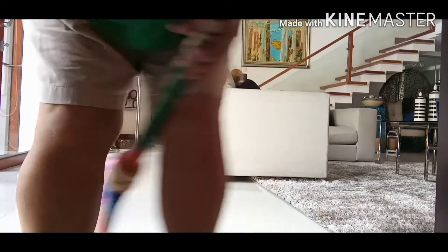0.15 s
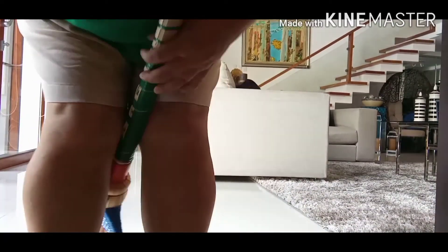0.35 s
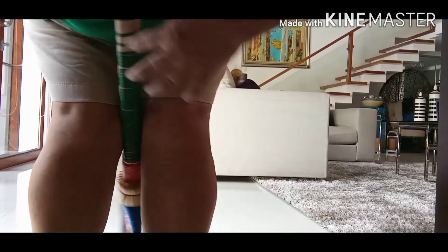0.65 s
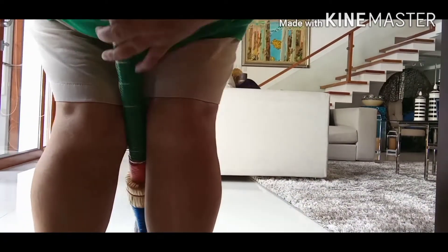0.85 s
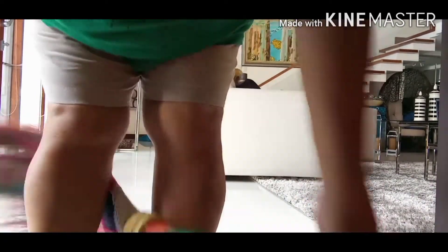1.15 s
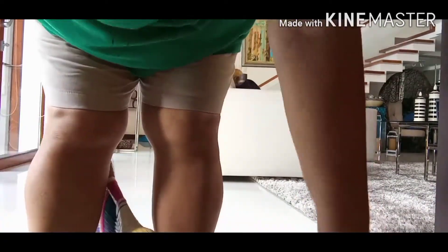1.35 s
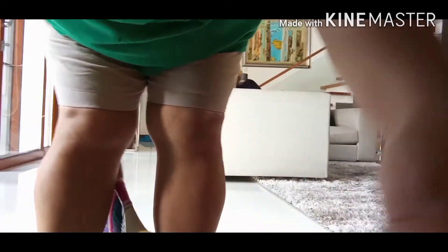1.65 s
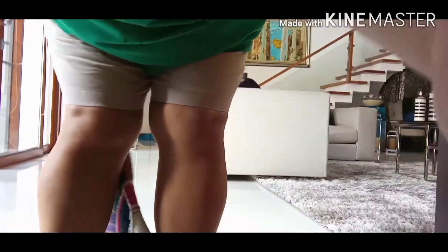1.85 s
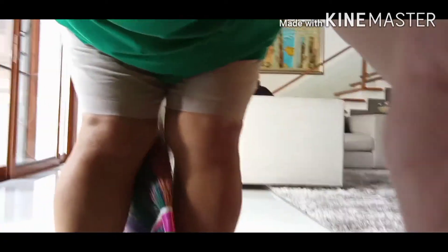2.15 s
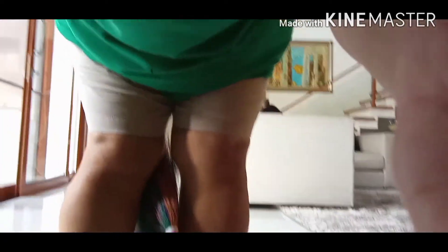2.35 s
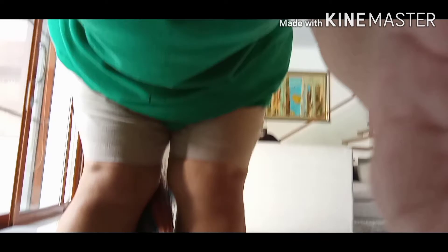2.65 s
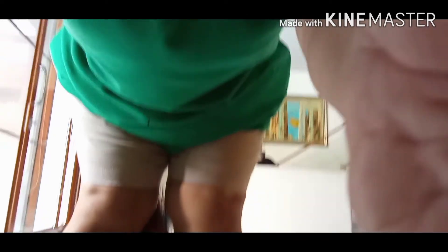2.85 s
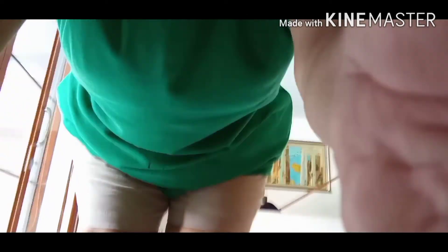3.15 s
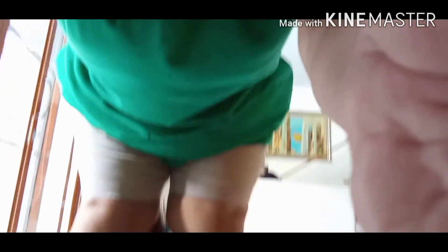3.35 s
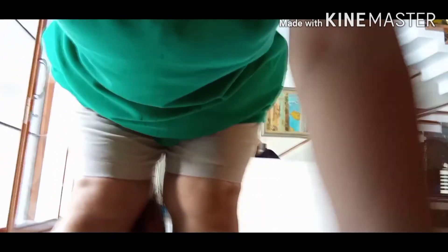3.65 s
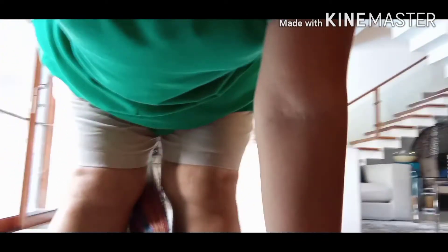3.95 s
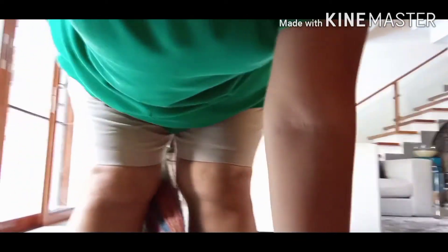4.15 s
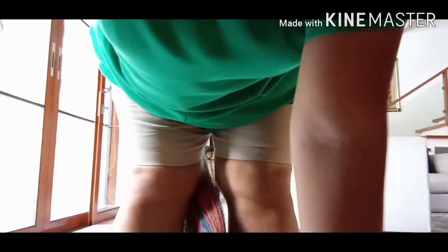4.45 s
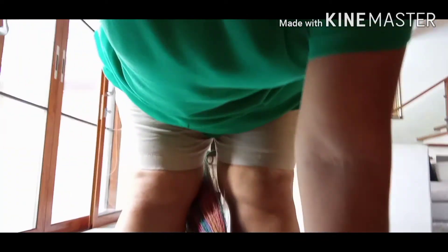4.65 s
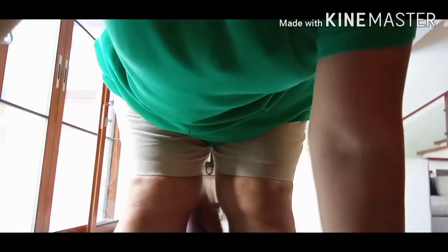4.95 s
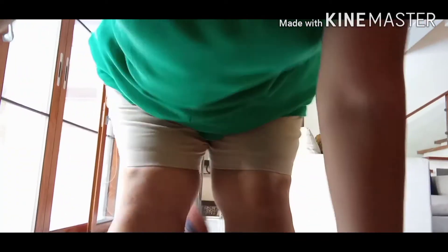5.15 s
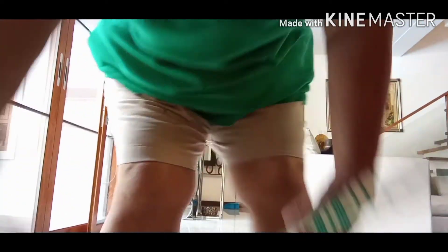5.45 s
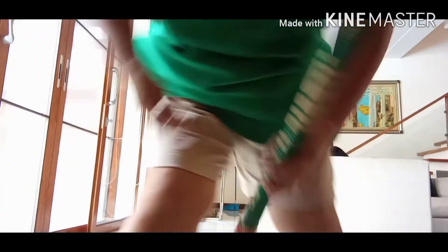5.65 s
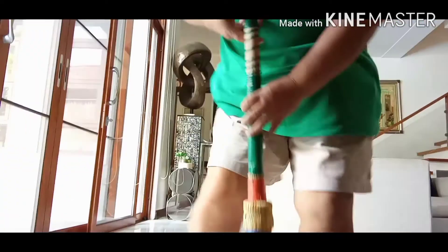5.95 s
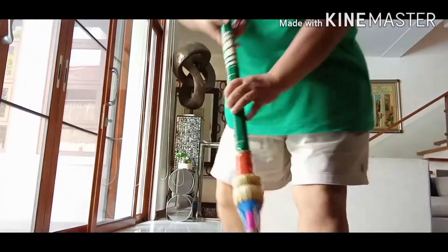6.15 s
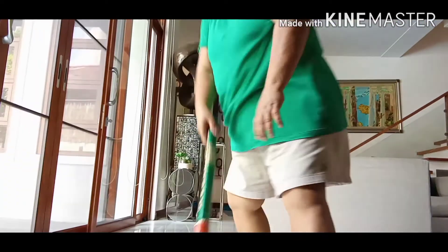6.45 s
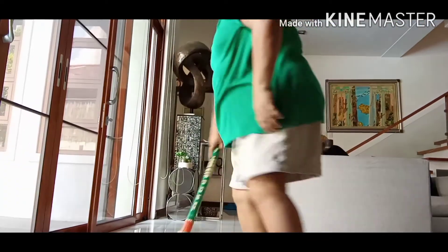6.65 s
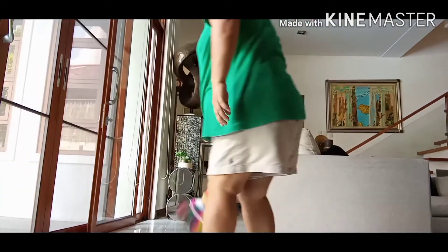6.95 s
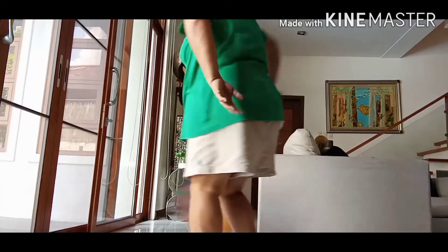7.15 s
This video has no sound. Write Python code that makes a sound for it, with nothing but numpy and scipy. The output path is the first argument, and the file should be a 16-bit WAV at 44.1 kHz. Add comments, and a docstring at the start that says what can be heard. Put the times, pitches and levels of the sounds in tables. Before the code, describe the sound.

Close to a hand-held phone in a house, soft bristles brush over tiles, pushing bits that drag, tick and faintly ring. Sharp clicks are much louder than the sweeping: one burst comes early, and several groups of dry taps follow in the middle as the phone is handled. The light swishes carry on to the end with a few more clicks, over a thin, continuous hiss.

```python
"""A soft broom sweeps a tiled floor close to a hand-held phone with two microphones.
Bristles swish on the glaze and debris drags dully, clicks and rings on the tiles; small metal
pieces sing as they slide and a hollow thing resonates when pushed. Handling the phone adds dry,
close taps and the rumble of fingers on the case.
Behind it are room tone, one brief low hum and a steady band of high hiss."""
import sys
import numpy as np
from scipy import signal
from scipy.io import wavfile
from scipy.ndimage import uniform_filter1d

SR = 44100
rng = np.random.default_rng(int(sys.argv[2]) if len(sys.argv) > 2 else 0)


def store_pcm(level_fs):
    """Save levels as 16-bit WAV."""
    pcm = np.round(np.clip(level_fs, -1, 1) * 32767).astype(np.int16)
    wavfile.write(sys.argv[1], SR, np.atleast_2d(pcm).T)


N = 321930
LEFT_LAG_S, COHERENCE = 41 / SR, 0.12  # between the microphones


def amp(db):
    return 10 ** (np.asarray(db) / 20)


def unit_rms(x):
    return x / np.sqrt(np.mean(x ** 2) + 1e-20)


def db_at(points, hz):
    """Interpolate a spectrum over log frequency."""
    point_hz, db = np.transpose(points)
    return np.interp(np.log(hz + 1), np.log(point_hz + 1), db)


def pan(left_over_right_db):
    """Left and right gains of mean power 1."""
    left = 1 / (1 + amp(-2 * np.asarray(left_over_right_db)))
    return np.sqrt(2 * np.array([left, 1 - left]))


def resonate(x, hz, width_hz):
    """One resonance of gain 1."""
    r = np.exp(-np.pi * width_hz / SR)
    return 2 * signal.lfilter([1 - r], [1, -r * np.exp(2j * np.pi * hz / SR)], x).real


def envelopes(rows):
    """Rows rise, hold and fade, adding in power; one gain curve per level column."""
    t = np.arange(0, N / SR + .001, .001)
    start, rise, hold, fade, *levels = np.transpose(rows)[..., None]
    attack = np.clip((t - start) / rise, 0, 1) ** 1.5
    decay = amp(-fade * np.maximum(t - start - rise - hold, 0))
    gains = [np.linalg.norm(amp(db) * attack * decay, axis=0) for db in levels]
    return [np.interp(np.arange(N) / SR, t, gain) for gain in gains]


# Port imbalance: (frequency [Hz], left over right [dB])
PORT_BALANCE = [(60, -6), (110, 4), (200, 13), (380, -2), (700, 9), (1290, 48), (2380, 89), (4400, -10),
                (8120, 33), (15000, -72)]
def noise(spectrum, patchy_db, flicker_db, lean=0., size=512):
    """Stereo noise with drifting patches and broadband flicker; lean scales the port imbalance."""
    frames, hz = 4 * N // size + 5, np.fft.rfftfreq(size, 1 / SR)[:, None]
    a, b, c, d, patches = rng.standard_normal((frames, len(hz), 5)).T
    patches = unit_rms(uniform_filter1d(uniform_filter1d(patches, size=6, axis=0), size=16, axis=1))
    flicker = unit_rms(uniform_filter1d(rng.standard_normal(frames), size=3))
    right = a + 1j * b
    shared = COHERENCE * right * np.exp(-2j * np.pi * hz * LEFT_LAG_S)
    left = shared + np.sqrt(1 - COHERENCE ** 2) * (c + 1j * d)
    gain = amp(db_at(spectrum, hz) + patchy_db * patches + flicker_db * flicker)
    bins = np.array([left, right]) * gain * pan(lean * db_at(PORT_BALANCE, hz))
    out = signal.istft(bins, nperseg=size, noverlap=3 * size // 4)[1][:, :N]
    return out / np.sqrt(np.mean(out.mean(0) ** 2))


def reverb(x, bass_t60_s=0.28):
    """Room tail: decaying noise, duller as it dies, different on each side."""
    hz, t, bins = signal.stft(rng.standard_normal((2, SR // 2)), SR, nperseg=256)
    t60_s = bass_t60_s / (1 + hz[:, None] / 9000)
    tail = signal.istft(bins * amp(-60 * t / t60_s), SR, nperseg=256)[1]
    tail[:, :150] = 0
    return signal.fftconvolve(x, tail / np.linalg.norm(tail[0]), axes=1)[:, :N]


# Room tone: (frequency [Hz], relative density [dB])
ROOM_SPECTRUM = [(30, 7), (76, 3), (200, -4), (480, -10.5), (1200, -11.5), (2400, -7.5), (3500, -14.5),
                 (4500, -20), (5500, -25.5), (9500, -10), (12000, -16), (13700, -40), (15000, -15),
                 (15600, -26), (16000, -64)]
def room_tone():
    """Faint broadband floor of the house."""
    return amp(-66) * noise(ROOM_SPECTRUM, patchy_db=1.5, flicker_db=.5, lean=1., size=2048)


# Hiss loudness: (time [s], level [dB])
HISS_LEVEL = [(0.0, -52.5), (1.6, -55), (2.08, -52), (2.22, -47), (2.38, -53), (3.78, -52), (3.81, -60),
              (3.87, -53), (4.86, -52.5), (5.2, -54), (6.08, -54.5), (7.3, -53)]
# Hiss band: (frequency [Hz], relative density [dB])
HISS_SPECTRUM = [(4000, -75), (5200, -107), (5900, -8.5), (6600, -1), (7500, 3), (8300, 1), (9000, -7.5),
                 (9800, -65), (11500, -70)]
def high_hiss():
    """Continuous 6-9 kHz band with one brief swell and one brief dip."""
    level_db = np.interp(np.arange(N) / SR, *np.transpose(HISS_LEVEL))
    return amp(level_db) * noise(HISS_SPECTRUM, patchy_db=1.64, flicker_db=0.67, lean=0.71)


# Hum swell: (start [s], rise [s], hold [s], fade [dB/s], level [dB])
HUM_SWELL = [(5.95, 0.13, 0.91, 40, -65.5)]
def low_hum(hz=136, width_hz=27):
    """Narrow low noise that swells once."""
    hum = resonate(resonate(rng.standard_normal(N), hz, width_hz), hz, 2 * width_hz)
    return envelopes(HUM_SWELL)[0] * unit_rms(hum) * pan([4.])


# Air rumble: (frequency [Hz], relative density [dB])
PORT_SPECTRUM = [(18, -60), (30, 7), (65, 5), (86, -5.5), (155, -14.5), (194, -19), (260, -41), (280, -71),
                 (360, -68), (620, -120)]
def port_air():
    """Air rumbles unevenly at the microphone ports."""
    return amp(-66.5) * pan([7.5]) * noise(PORT_SPECTRUM, patchy_db=3.5, flicker_db=5.0, size=2048)


# Finger shifts: (peak time [s], level [dB])
FINGER_THUMPS = [(.21, -52.5), (0.281, -41), (0.332, -48), (.41, -35.5), (0.451, -41.5), (0.512, -41),
                 (0.552, -45), (0.608, -35.5), (.89, -57), (1.12, -52.5), (1.4, -59), (2.5, -60),
                 (3.78, -55), (3.94, -53), (4.02, -60), (4.51, -68), (4.66, -53), (5.81, -64), (6.16, -67),
                 (6.69, -56.5)]
# Case rumble: (frequency [Hz], relative density [dB])
FINGER_SPECTRUM = [(25, -24), (55, 5), (85, 2.5), (140, -2.5), (200, -12), (270, -27.5), (400, -53),
                   (620, -110)]
def fingers(rise_s=0.038, fade_db_per_s=447):
    """Fingers shift on the case at the left port."""
    level, = envelopes([(s - rise_s, rise_s, 0, fade_db_per_s, db) for s, db in FINGER_THUMPS])
    return level * pan([36]) * noise(FINGER_SPECTRUM, patchy_db=1.5, flicker_db=0.5, size=2048)


# Soft bumps: (time [s], level [dB], frequency [Hz], t60 [s], left over right [dB])
LOW_BUMPS = [(3.769, -38.5, 99.6, 0.037, 30), (3.921, -39.5, 355.5, 0.14, 7), (4.663, -27.5, 132, 0.02, 18)]
def bumps(size=8192):
    """Each bump is a damped low sine."""
    out, t = np.zeros((2, N + size)), np.arange(size) / SR
    for s, db, hz, t60_s, pan_db in LOW_BUMPS:
        bump = amp(db - 60 * t / t60_s) * np.sin(2 * np.pi * hz * t) * np.minimum(t / 0.0013, 1)
        at = round(s * SR)
        out[:, at:at + size] += pan([pan_db]) * bump
    return out[:, :N]


# Modes of the low ring, then the high ring: (frequency [Hz], width [Hz], relative gain [dB])
HOLLOW_MODES = [
    [(245, 11.7, -10.5), (221, 73, -20.5)],
    [(372, 28.3, 13.5), (312.8, 13.3, 12), (398, 25, 3)],
]
# Pushes: (start [s], rise [s], hold [s], fade [dB/s], low ring [dB], high ring [dB])
HOLLOW_SHOVES = [(.735, 0.015, 0.023, 59, -48, -46), (0.997, 0.026, .02, 52, -54, -39),
                 (1.692, 0.04, .18, 400, -77, -66.5), (2.44, 0.028, 0.31, 141, -48.5, -52.5),
                 (3.943, 0.0072, .005, 300, -66, -57), (4.057, .1, 0.018, 300, -81, -59),
                 (4.578, 0.056, 0.039, 900, -62, -48), (5.146, 0.038, 0.096, 300, -90, -65.5)]
def hollow_body():
    """Rubbing shakes the hollow body during each shove."""
    rub = noise([(100, 0), (1000, 0)], patchy_db=0., flicker_db=0., size=2048)
    rub = rub - 0.3 * rub[::-1]  # drives the two ports partly in antiphase
    out = np.zeros((2, N))
    for shove, modes in zip(envelopes(HOLLOW_SHOVES), HOLLOW_MODES):
        ring = sum(amp(db) * resonate(resonate(rub, hz, width), hz, 3 * width)
                   for hz, width, db in modes)
        out += shove * unit_rms(ring)
    return out


# Metal pieces: (modes, roughness [ratio], slides); modes: (frequency [Hz], gain [dB]);
# slides: (start [s], rise [s], hold [s], fade [dB/s], level [dB])
METAL_PIECES = [ ([(673, -3.5), (1461, 8), (2030, -8), (2475, 5), (3755, -1.5), (3766, 6.5), (8950, -7),
                (11040, -6)], 0.69, [(.47, 0.032, 0.078, 62, -56), (.72, 0.049, 0.009, 60.5, -56.5)]),
                ([(5266, 5), (6900, 4), (4680, -4.5)], 1.86, [(.47, 0.024, .01, 60, -63.5),
                (.71, 0.06, 0.097, 110, -55.5)]), ([(1841, 1), (3397, -3), (4172, 4.5), (4209, -5),
                (5060, -18), (5970, -21), (6546, -4), (7059, 3.5), (7190, -8), (8225, -15), (8479, -16),
                (9895, -26), (11050, -14), (11970, -26), (14900, -23)],
                1.9, [(2.13, 0.028, 0.1, 85, -48.5)]), ([(2435, -6.5), (1540, -11)],
                2.1, [(2.64, 0.038, 0.013, 162, -46.5), (2.94, 0.051, .01, 117, -51.5)]), ([(2980, -1)],
                3.1, [(1.67, .04, 0.16, 180, -64), (3.435, .005, 0.0091, 498, -52.5),
                (3.55, 0.056, 0.12, 300, -56)]), ([(1000, 7), (2100, 11.5), (3400, -4)],
                4.8, [(6.0, 0.02, 0.042, 495, -68.5)]), ([(1530, -2.5), (2300, -4), (2650, -9)],
                4.77, [(3.97, .13, .01, 80, -63.5), (4.2, 0.063, 0.06, 150, -66)]), ]
def sliding_metal():
    """Scraping keeps narrow modes ringing; each wavers in level and phase by itself."""
    out = np.zeros((2, N))
    for modes, roughness, slides in METAL_PIECES:
        level, = envelopes(slides)
        active = np.flatnonzero(level > 3e-5)
        t = (active - active[0]) / SR
        for hz, db in modes:
            knots = rng.standard_normal((4, 512))
            knots_per_s = 33 * roughness * (1 + hz / 6000)
            waver = np.array([np.interp(t * knots_per_s, np.arange(512), k) for k in knots])
            phase = 2 * np.pi * hz * (t - np.array([[LEFT_LAG_S], [0]])) + 1.7 * waver[2:]
            gain = level[active] * amp(db + 3 * np.sqrt(roughness) * waver[:2])
            out[:, active] += gain * np.sqrt(2) * np.sin(phase) * pan([5.5])
    return out


# Sharp clicks, from debris on the tiles and dry, close handling taps on the phone:
# (time [s], knock [dB], clack [dB], tick [dB], air [dB], knock [Hz], clack [Hz],
# left over right [dB], room send [dB])
CLICKS = [(0.09, -62, -42, -52, -63, 1720, 4200, 15, -14), (0.117, -45, -29, -57, -47, 1500, 2100, 14, -12),
          (0.177, -66, -38, -32, -27.5, 743, 4520, -1, 4.5),
          (0.195, -35, -26, -22.5, -38, 600, 2470, 6, -6), (0.921, -42, -37, -36, -26.5, 900, 4550, 9, -7),
          (2.048, -13, -15.5, -11.5, -39, 1400, 2330, 3.5, -13.5),
          (2.089, -19.5, -25.5, -26, -38, 860, 1944, 3, -9.5),
          (2.104, -27, -50, -30, -46, 1360, 2010, 13, 1), (2.79, -63, -63, -48, -38, 1270, 1920, -2, -16),
          (3.388, -28.5, -31, -33.5, -30, 620, 1800, 3, -15.5),
          (3.4, -34, -47, -34, -45, 1396, 4270, 3, -10),
          (3.408, -18, -17.5, -41, -16, 1070, 3350, -21, -26),
          (3.438, -25, -31, -24.5, -22, 1100, 2590, -7, -34),
          (3.625, -18.5, -25, -49, -35, 1170, 2900, 19.5, -20),
          (3.74, -43, -35, -31, -25, 1440, 4590, -1, -15), (3.761, -55, -43, -40, -32, 1560, 3160, 1, -14),
          (3.775, -30, -27.5, -22, -24, 1570, 3650, 3, -14),
          (4.562, -25, -26.5, -15, -17, 1710, 2480, 6, -10.5),
          (4.625, -22, -30, -35, -46, 1800, 2270, 3, -9.5),
          (4.63, -32, -29.5, -38, -54, 1900, 2850, -1, -13),
          (4.66, -34.5, -40, -34, -34, 1630, 2260, -1, -31),
          (4.697, -62, -35.5, -49, -38, 1750, 2780, 20, -14),
          (4.735, -46, -54, -48, -35.5, 1530, 3670, 20, 2), (4.79, -56, -47, -50, -55, 1500, 3500, 16, -20),
          (4.797, -55, -39, -50, -55, 1500, 2900, 16, -20),
          (4.848, -30, -25.5, -32, -34, 680, 2500, 16, -18),
          (5.101, -68, -66, -31, -30, 1500, 3540, 10, -17), (5.652, -67, -37, -49, -37, 1720, 2880, 0, -8),
          (5.669, -29, -19, -15, -15.5, 1040, 2970, 3, -13), (5.709, -57, -32, -40, -44, 1270, 3620, 6, 0),
          (6.269, -38, -33, -21.5, -33, 1500, 2860, 3, -10),
          (6.312, -30, -32.5, -55, -56, 1500, 2080, 8, -1.5),
          (6.329, -45, -37, -57, -59, 1410, 2500, 2, -6), (6.424, -57, -40.5, -39, -40, 1340, 2730, 9, -9),
          (6.919, -59, -45.5, -58, -49, 1590, 2010, 9, 3), (7.023, -58, -33, -38, -53, 1660, 2330, 4, -5.5)]
# Broad modes of the tick, then the air band: (frequency [Hz], width [Hz], relative gain [dB])
TREBLE_MODES = [
    [(6430, 780, 1.1), (8310, 1300, 2.2)],
    [(10900, 7100, -1.4), (15000, 2400, -0.58)],
]
def clicks(rise_s=.0012, blow_gain=3.7, size=2048):
    """Contact noise builds to one sharp blow that excites four bands of broad rings."""
    direct, send = np.zeros((2, 2, N + size))
    t, lag = np.arange(size) / SR, round(LEFT_LAG_S * SR)
    since_blow_s = np.maximum(t - rise_s, 0)
    for s, *band_db, knock_hz, clack_hz, pan_db, send_db in CLICKS:
        t60_s = 0.034 * amp(0.38 * send_db)  # drier clicks ring shorter
        contact = rng.standard_normal((2, size))
        blow = (contact + blow_gain * np.sinc((t - rise_s) * SR)) * np.minimum(t / rise_s, 1) ** 2
        knock = [(knock_hz, 8.1 / t60_s, 0), (1.65 * knock_hz, 700, -5)]
        clack = [(clack_hz, 6.7 / t60_s, 0), (4600, 1800, -12)]
        bands = zip(band_db, [knock, clack, *TREBLE_MODES], (0.92, 1.15, 0.75, 0.19))
        click = np.zeros((2, size))
        for peak_db, modes, t60_ratio in bands:
            burst = blow * amp(-60 * since_blow_s / max(t60_s * t60_ratio, .002))
            ring = sum((-1) ** k * amp(db) * resonate(burst, hz, width)
                       for k, (hz, width, db) in enumerate(modes))
            click += amp(peak_db) * ring / abs(ring).max(1)[:, None]
        for side, gain in enumerate(pan(pan_db)):
            at = round(s * SR) - side * lag + lag // 2 - round(rise_s * SR / 2)
            direct[side, at:at + size] += gain * click[side]
            send[side, at:at + size] += amp(send_db) * gain * click[side]
    return direct[:, :N] + reverb(send[:, :N])


# Debris pushes: (start [s], rise [s], hold [s], fade [dB/s], level [dB])
DRAG_STROKES = [(0, 0.15, .01, 64, -64), (.4, 0.12, 0.011, 75, -64), (.735, .01, 0.13, 67, -49.5),
                (.92, .005, 0.0091, 130, -63), (1.0, 0.058, 0.036, 79.5, -51.5),
                (2.05, 0.0024, .005, 79, -40), (2.46, 0.0036, 0.24, 60, -50.5),
                (3.5, 0.19, 0.012, 300, -61), (3.73, 0.0042, 0.0091, 157, -53.5),
                (3.82, 0.083, 0.0076, 142, -54.5), (4.6, 0.19, 0.056, 64, -68),
                (4.94, 0.011, 0.013, 258, -50.5), (5.35, .16, 0.18, 200, -66), (5.67, .003, .01, 61, -54),
                (6.27, 0.022, .01, 130, -58), (6.44, 0.02, .01, 123, -66), (6.9, 0.099, .01, 92, -67.5)]
# Debris friction: (frequency [Hz], relative density [dB])
DRAG_SPECTRUM = [(300, -7), (600, -2.5), (900, -1.5), (1400, 0), (1900, 3), (2500, -7), (3200, -16),
                 (5000, -78)]
def debris_drag(rest_db=-73.5):
    """What the broom pushes along scrapes dully over the tiles."""
    level = np.hypot(envelopes(DRAG_STROKES)[0], amp(rest_db))
    return level * noise(DRAG_SPECTRUM, patchy_db=3.0, flicker_db=0.74, size=1024) * pan([2.5])


# Broom strokes: (start [s], rise [s], hold [s], fade [dB/s], swish [dB], airy top [dB])
BROOM_STROKES = [(0, .17, .02, 90, -50.5, -57), (.74, 0.043, .01, 67, -49.5, -54.5),
                 (.92, 0.0045, 0.011, 65, -49.5, -53), (1.01, 0.0037, 0.21, 68, -55.5, -56.5),
                 (1.7, 0.37, .01, 300, -56, -57), (2.05, 0.028, 0.16, 103, -49, -53.5),
                 (2.46, .005, .01, 74, -70, -83), (3.45, 0.16, .1, 200, -62.5, -88),
                 (3.73, 0.0046, 0.041, 600, -51, -57), (3.82, 0.058, 0.0088, 79, -57.5, -70),
                 (4.0, .2, 0.17, 200, -80, -76), (4.56, 0.0021, .005, 250, -54, -54),
                 (4.62, 0.14, .01, 53, -57.5, -62), (4.9, 0.017, 0.048, 37, -62.5, -65.5),
                 (5.2, 0.13, 0.325, 300, -56.5, -60), (5.67, 0.0024, 0.011, 75, -44.5, -49),
                 (5.8, 0.065, 0.0082, 130, -48, -51.5), (6.27, 0.0038, 0.044, 44, -52, -61.5),
                 (6.42, 0.082, 0.093, 298, -55.5, -57.5), (7.03, .005, 0.0088, 130, -52.5, -65),
                 (7.06, 0.054, .01, 37, -63, -67)]
# Bristle swish: (frequency [Hz], relative density [dB])
SWISH_SPECTRUM = [(500, -60), (1200, -17), (2200, -1.5), (3000, 3), (4500, 0), (6000, 2), (8000, 0),
                  (10000, -10.5), (11500, -30), (14000, -60)]
# Airy top of the swish: (frequency [Hz], relative density [dB])
TOP_SPECTRUM = [(6000, -58), (8000, -29), (9500, -3), (11500, -2), (13000, -12.5), (14000, -3),
                (15000, -9.5), (15600, 8), (15900, -51), (16400, -43)]
def bristles(swish_rest_db=-77, top_rest_db=-79.5):
    """Bristles hiss over the glaze; a faint rustle remains between strokes."""
    swish_level, top_level = envelopes(BROOM_STROKES)
    swish = noise(SWISH_SPECTRUM, patchy_db=3.0, flicker_db=0.15, size=256) * pan([4.])
    top = noise(TOP_SPECTRUM, patchy_db=2.0, flicker_db=0.6, size=256) * pan([-1.5])
    return np.hypot(swish_level, amp(swish_rest_db)) * swish + np.hypot(top_level, amp(top_rest_db)) * top


def scene():
    background = room_tone() + high_hiss() + port_air() + fingers() + low_hum()
    foreground = bristles() + debris_drag() + hollow_body() + sliding_metal() + clicks() + bumps()
    return background + foreground


def record(dry, low_cut_hz=62., band_limit_hz=16700):
    """Small microphones lose the deepest bass; then the band limit."""
    thin = signal.sosfilt(signal.butter(4, low_cut_hz, "high", fs=SR, output="sos"), dry)
    lowpass = signal.firwin(511, band_limit_hz, window=("kaiser", 9), fs=SR)
    return signal.oaconvolve(thin, lowpass[None], "same")


dry = scene()
out = record(dry)
store_pcm(out)
```